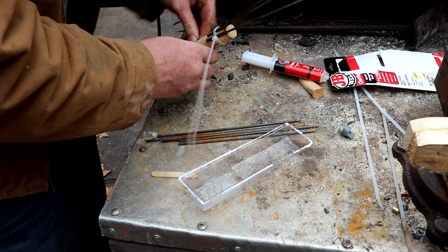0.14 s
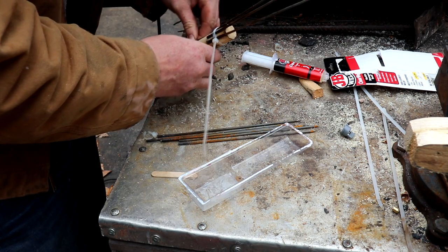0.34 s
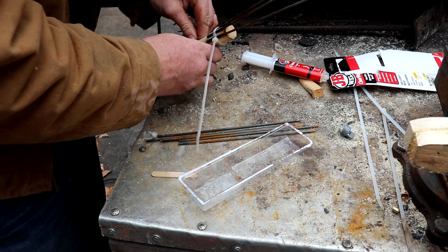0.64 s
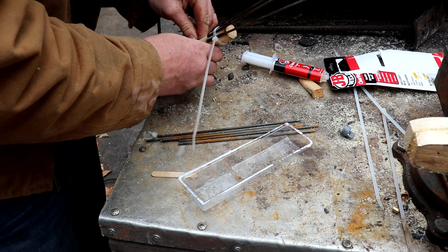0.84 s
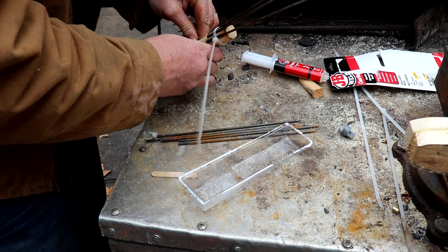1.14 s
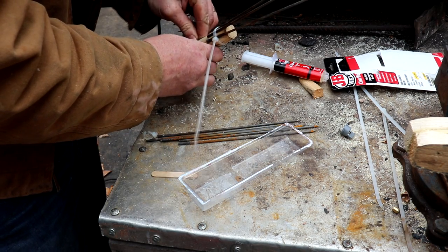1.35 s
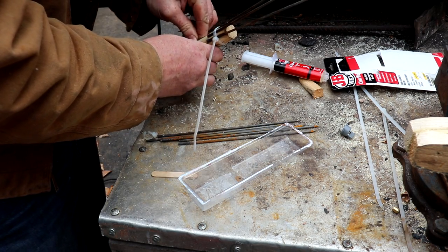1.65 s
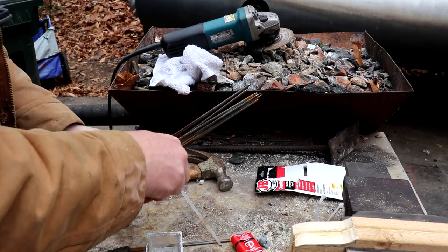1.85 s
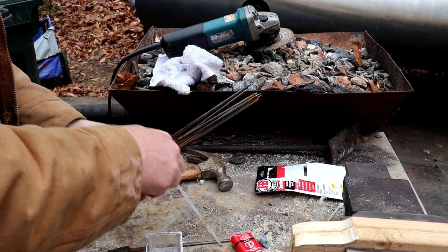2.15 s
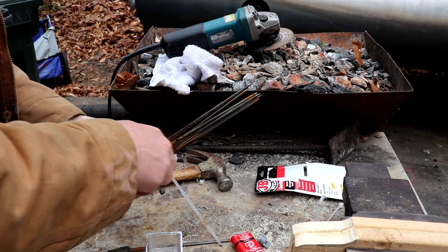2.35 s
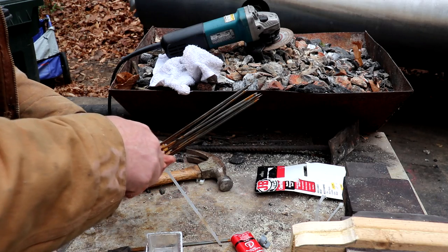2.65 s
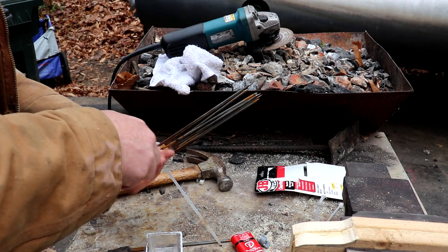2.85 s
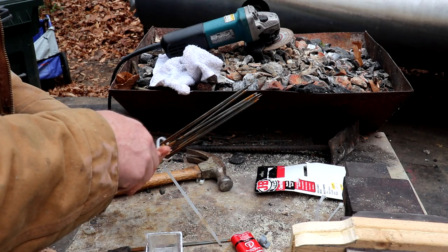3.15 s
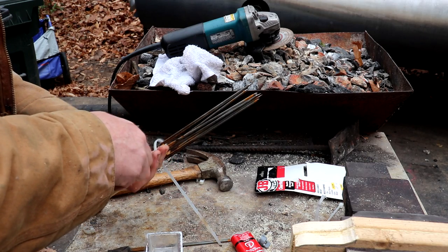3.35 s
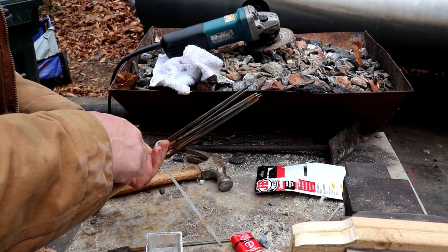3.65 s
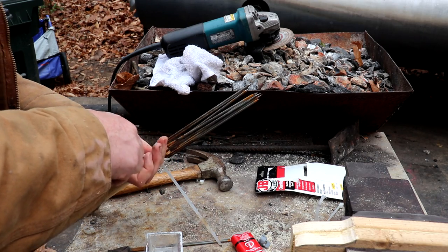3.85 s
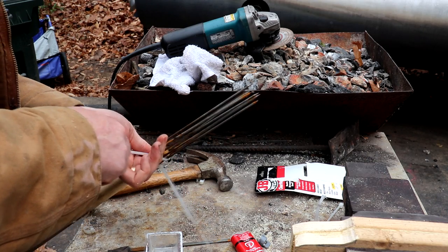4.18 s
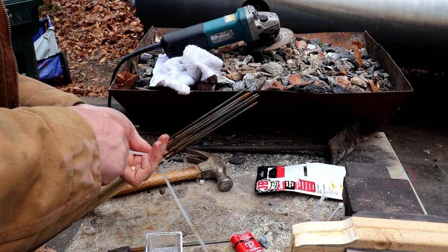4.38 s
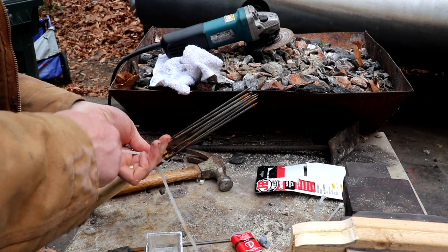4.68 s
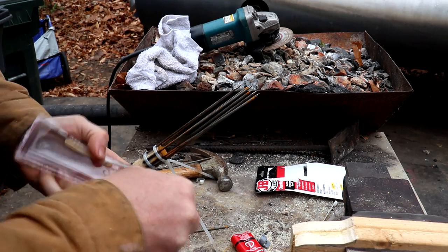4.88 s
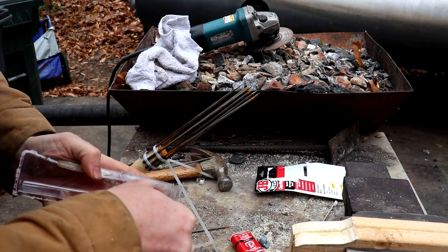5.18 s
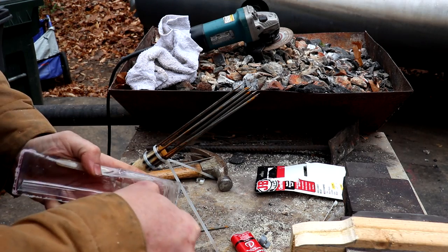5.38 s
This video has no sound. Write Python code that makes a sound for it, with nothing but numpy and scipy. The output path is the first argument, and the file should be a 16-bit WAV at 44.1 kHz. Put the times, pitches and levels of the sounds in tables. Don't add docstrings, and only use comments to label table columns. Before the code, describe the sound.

Close, dry bench sounds in an open yard with distant traffic rumbling. Rods hum and rustle as they are dragged, then knock on the metal top. A thin far bird call comes before clear high whistles that overlap the first crisp zip-tie pull. After handling rustle the second tie clicks tight, with a short scuff and soft thuds; finally a plastic tray flexes with two hard pops. Abrupt scene cuts.

```python
import sys
import numpy as np
from scipy import signal
from scipy.fft import rfft, irfft
from scipy.io import wavfile
from scipy.ndimage import uniform_filter1d

SR = 44100
rng = np.random.default_rng(int(sys.argv[2]) if len(sys.argv) > 2 else 0)


def output_pcm(signal):
    pcm = np.clip(np.atleast_2d(signal).T, -1, 1) * 32767
    wavfile.write(sys.argv[1], SR, np.round(pcm).astype(np.int16))


def volts_from_db(level):
    exponent = np.asarray(level, float) / 20
    return 10 ** exponent


N = 243431


def in_time(rows):
    s, *columns = np.transpose(rows)
    return [np.interp(np.arange(N) / SR, s, c) for c in columns]


def rms_one(x):
    return x / np.sqrt(np.mean(x ** 2) + 1e-20)


def drift(rate_hz):
    steps = rng.standard_normal(int(N / SR * 60) + 2)
    place = np.arange(N) / SR * np.clip(rate_hz, .1, 60)
    return np.interp(place, np.arange(len(steps)), steps)


def coloured(spectrum, patchy_db):
    hz, db = np.transpose(spectrum)
    f = np.fft.rfftfreq(N, 1 / SR) + 1
    shape = volts_from_db(np.interp(np.log(f), np.log(hz), db, -99, -99))
    noise = irfft(rfft(rng.standard_normal(N)) * shape, N)
    return rms_one(noise * volts_from_db(patchy_db * drift(16)))


def resonance(x, hz, width_hz):
    r = np.exp(-np.pi * width_hz / SR)
    b = np.array([1, 0, -1]) * (1 - r * r) / 2
    return signal.lfilter(b, [1, -2 * r * np.cos(2 * np.pi * hz / SR), r * r], x)


def add(out, s, sound):
    i = round(s * SR)
    out[i:i + len(sound)] += sound[:N - i]


def struck(modes, t, spread_db):
    hz, db, t60 = np.transpose(modes)[:, :, None]
    level_db = db + spread_db * rng.standard_normal(hz.shape) - 60 * t / t60
    return np.sum(volts_from_db(level_db) * np.sin(2 * np.pi * hz * t), axis=0)


def crack(t, t60, low_hz):
    burst = rng.standard_normal(len(t)) * volts_from_db(-60 * t / t60)
    return signal.sosfilt(signal.butter(2, low_hz, "high", fs=SR, output="sos"), burst)


def swells(rows):
    s, db, rise, fall = np.transpose(rows)[:, :, None]
    t = np.arange(N) / SR - s
    slope = np.where(t < 0, t / rise, -t / fall)
    return np.sqrt(np.sum(volts_from_db(db + 20 * slope) ** 2, axis=0))


def yard(x, near_db, far_db):
    t = np.arange(9000) / SR
    near = volts_from_db(near_db - 60 * t / 0.028) * (t > .0008)
    far = volts_from_db(far_db - 60 * t / 0.18) * (1 - np.exp(-(t / 0.017) ** 2))
    scatter, answer = rng.standard_normal((2, len(t))) * [near, far]
    scatter = scatter + volts_from_db(9.5) * resonance(scatter, 2230, 1600)
    answer = answer + volts_from_db(19.0) * resonance(answer, 2680, 1800)
    return x + signal.fftconvolve(x, scatter + answer)[:N]


# [pitch_hz, level_db per Hz]
TRAFFIC = [(12, -63), (20, -12.5), (163, -2), (221, -3.5), (270, -11), (347, -14.5), (424, -23.5),
           (677, -17.5), (857, -35), (1080, -36), (1500, -55), (1950, -72), (3300, -120)]
# [pitch_hz, level_db per Hz]
HANDLING = [(240, -10.5), (400, -3), (677, -5.5), (882, -6.5), (1080, -7.5), (1260, -8.5), (1360, -9.5),
            (1550, -12), (3140, -11), (7000, -35), (9100, -38.5), (15400, -120)]
# [pitch_hz, level_db per Hz]
AIR = [(2350, -19), (4000, -4.5), (7630, 2.5), (8250, 2), (15100, -1), (16200, -16), (16500, -35.5)]
TAKE_STARTS = [0, .572, 1.756, 3.0, 4.794]
# [traffic_db, handling_db, air_db]
TAKES = [
    (-52.5, -48, -68),
    (-52, -55, -69),
    (-48.5, -55.5, -67.5),
    (-47, -56, -67.5),
    (-45.5, -52.5, -65.5),
]
# [peak_s, level_db, rise_s, fall_s]
HANDS = [
    (1.15, -37.5, 0.011, 0.092),
    (2.6, -46, 0.22, 0.1),
    (4.13, -42.5, 0.21, 0.51),
    (4.25, -40.5, 0.025, 0.039),
    (5.28, -58, 0.34, 0.55),
]


def ground():
    take = np.searchsorted(np.array(TAKE_STARTS) * SR, np.arange(N), side="right") - 1
    traffic, hands, air = volts_from_db(np.array(TAKES)[take].T)
    hands = (hands + swells(HANDS)) * coloured(HANDLING, patchy_db=2.0)
    return traffic * coloured(TRAFFIC, patchy_db=1.5) + hands + air * coloured(AIR, patchy_db=0.0)


# [peak_s, level_db, rise_s, fall_s]
DRAG = [
    (.2, -48, 0.063, 0.23),
    (.42, -57, 0.078, 0.17),
    (4.25, -31, 0.033, 0.024),
]
# [pitch_hz, width_hz, level_db]
DRAGGED = [(362, 83, 7), (726, 45, 7.5), (1635, 48, 20), (2580, 106, 14.5), (3385, 200, 18.5),
           (3490, 71, -8), (5000, 680, -50)]
STEADY_DRAG_DB = -53


def drag():
    grains = rng.standard_normal(N) * volts_from_db(3.9 * drift(45))
    first = np.arange(N) < TAKE_STARTS[1] * SR
    level = first * (swells(DRAG[:2]) + volts_from_db(STEADY_DRAG_DB)) + swells(DRAG[2:])
    hum = sum(volts_from_db(db) * resonance(grains, hz, width) for hz, width, db in DRAGGED)
    return level * rms_one(hum)


# [start_s, peak_db, boom_db, crack_db, brightness_db per octave]
KNOCKS = [(0.047, -30.5, -40, -62, -2), (0.77, -30, -37.5, -59, -4.5), (0.85, -30.5, -42, -80, -6),
          (0.924, -51, -55, -88, -4), (1.036, -19.5, -35.5, -59, -5.5), (1.098, -32.5, -43, -54, 0),
          (1.135, -21.5, -36, -26.5, 3.5), (1.297, -20, -33, -26.5, 7), (1.413, -19, -32, -27.5, 5.5),
          (1.517, -18, -38.5, -24.5, 5), (1.636, -14, -38, -26, 2.5), (3.315, -40.5, -62, -37.5, 12)]
# [pitch_hz, level_db, t60_s]
BOOM = [(147, -9.5, 0.35), (224.7, 2.5, 0.18), (306, -4.5, 0.2), (396, -13.5, 0.2)]
# [pitch_hz, level_db, t60_s]
RODS = [(520, -22, 0.07), (867, -15, 0.07), (1250, -8, 0.06), (1325, 2, 0.07), (1420, -1, 0.05),
        (1520, -1, 0.05), (1775, -10, 0.1), (2064, -12, 0.056), (2390, -10, 0.03), (2700, -14, 0.03),
        (3000, -10, 0.015), (3310, -5, 0.025), (3780, -7, 0.022), (6930, -12, 0.0076)]


def knocks():
    out, t = np.zeros(N), np.arange(9000) / SR
    rise = 1 - np.exp(-t / 0.0012)
    slow_rise = 1 - np.exp(-t / 0.004)
    for s, peak_db, boom_db, crack_db, tilt_db in KNOCKS:
        modes = [(hz, db + tilt_db * np.log2(hz / 1400), t60) for hz, db, t60 in RODS]
        rods = volts_from_db(peak_db - 9.5) * rise * struck(modes, t, spread_db=1.9)
        add(out, s, rods + volts_from_db(crack_db + 0.5) * crack(t, 0.016, 3100))
        add(out, s, volts_from_db(peak_db - 38) * rise * resonance(crack(t, 0.18, 540), 1200, 1700))
        rattle = resonance(resonance(crack(t, 0.078, 490), 1520, 300), 1320, 280)
        add(out, s, volts_from_db(peak_db - 7.5) * rise * rattle)
        add(out, s + 0.0036, volts_from_db(crack_db - 13.5) * resonance(crack(t, 0.17, 1500), 2100, 790))
        boom = struck(BOOM, t, spread_db=3.0) + volts_from_db(15) * resonance(crack(t, 0.2, 90), 247, 100)
        add(out, s + 0.003, volts_from_db(boom_db + 4) * slow_rise * boom)
    return out


# [peak_s, level_db, rise_s, fall_s, pitch_hz]
BUMPS = [
    (.2, -40, 0.053, 0.089, 765),
    (4.15, -33, 0.073, 0.099, 112),
    (4.29, -44.5, 0.095, 0.086, 124),
    (4.41, -35.5, 0.075, 0.12, 121),
    (1.165, -40, 0.032, .04, 870),
    (4.1, -46, 0.11, 0.073, 3750),
    (4.12, -44, .1, 0.11, 585),
]
BUMP_WIDTH = 0.21


def bumps():
    white, out = rng.standard_normal(N), np.zeros(N)
    for *row, hz in BUMPS:
        width = BUMP_WIDTH * hz
        out += swells([row]) * rms_one(resonance(resonance(white, hz, width), hz, width))
    return out


def note(rows, fade_s, wobble_hz):
    hz, db = in_time(rows)
    power = volts_from_db(2 * db)
    hz = uniform_filter1d(hz * power, size=500) / uniform_filter1d(power, size=500)
    start, end = rows[0][0], rows[-1][0]
    gate, = in_time([(start, 0), (start + fade_s, 1), (end - fade_s, 1), (end, 0)])
    return np.sqrt(2) * gate * volts_from_db(db), np.cumsum(2 * np.pi * (hz + wobble_hz * drift(40)) / SR)


def afar(x, t60, direct_db):
    tail = rng.standard_normal(12000) * volts_from_db(-60 * np.arange(12000) / SR / t60)
    return volts_from_db(direct_db) * x + signal.fftconvolve(x, tail / np.linalg.norm(tail))[:N]


def roughness(size):
    return rms_one(uniform_filter1d(rng.standard_normal(N), size=size))


# [start_s, pitch_hz, level_db]
SEET = [(1.15, 8700, -70), (1.168, 8050, -59), (1.19, 7500, -56), (1.215, 7320, -56), (1.29, 7250, -61),
        (1.32, 7350, -67)]
# [start_s, pitch_hz, level_db]
WHISTLE = [
    [(1.757, 3300, -55), (1.763, 3220, -42), (1.771, 3300, -36.5), (1.795, 3170, -44), (1.803, 3280, -40.5),
     (1.879, 3310, -35), (1.885, 3370, -49), (1.93, 3230, -31)],
    [(1.93, 3270, -35), (1.962, 3237, -32), (1.98, 3250, -44), (1.984, 3220, -39), (2.028, 3223, -32),
     (2.07, 3200, -48)],
    [(2.07, 3254, -40), (2.096, 3220, -32), (2.11, 3340, -47), (2.126, 3230, -35), (2.196, 3270, -50),
     (2.202, 3440, -53), (2.21, 3330, -42)],
    [(2.22, 3169, -50), (2.234, 3140, -40), (2.248, 3205, -37), (2.284, 3234, -32.5), (2.298, 3230, -34),
     (2.312, 3280, -50), (2.315, 3240, -46)],
    [(2.315, 3180, -44), (2.333, 3270, -33), (2.353, 3240, -42), (2.363, 3230, -30), (2.387, 3290, -44),
     (2.403, 3235, -28.5), (2.451, 3253, -40), (2.48, 3288, -55)],
    [(2.53, 3297, -58), (2.542, 3122, -42), (2.558, 3260, -42), (2.604, 3260, -40), (2.62, 3170, -39),
     (2.628, 3330, -49), (2.67, 3170, -45), (2.7, 3340, -56)],
]
FLUTTER = .15


def birds():
    level, phase = note(SEET, 0.011, 70)
    low, high = np.sin(phase) * roughness(150), np.sin(1.075 * phase) * roughness(60)
    thin = level * (low + volts_from_db(-2) * high)
    notes = [note(rows, 0.003, 8.3) for rows in WHISTLE]
    whistle = sum(level * np.sin(phase) for level, phase in notes)
    echoes = afar(whistle, t60=0.2, direct_db=-40)
    whistle = whistle * (1 + FLUTTER * roughness(420)) * volts_from_db(0.5) + volts_from_db(-12) * echoes
    return whistle + volts_from_db(-4.0) * afar(thin, t60=.3, direct_db=-1.5)


def teeth_of(pull):
    s, speed, db = np.transpose(pull)
    t = np.arange(s[0], s[-1], 1 / SR)
    travelled = np.cumsum(np.interp(t, s, speed)) / SR
    times = np.interp(np.arange(int(travelled[-1]) + 1), travelled, t)
    return list(zip(times, np.interp(times, s, db)))


# [start_s, speed_teeth_per_s, peak_db]
FIRST_PULLS = [
    [(1.944, 29.5, -1), (1.988, 64.7, -2), (2.03, 56.1, -4), (2.066, 76.4, -5.5), (2.078, 62.3, -6),
     (2.143, 43.9, -6.5), (2.162, 92.8, -8), (2.187, 78.3, -8), (2.216, 105.2, -8)],
    [(2.22, 124.9, -17), (2.243, 136.4, -12.5), (2.271, 191.6, -7), (2.297, 179.8, -7), (2.329, 94, -7.5),
     (2.348, 57.8, -6.5)],
    [(2.3609, 68.9, -8), (2.428, 135, -5.5), (2.477, 114.7, -5.5), (2.513, 100.5, -6), (2.572, 113.1, -7),
     (2.592, 157, -11.5), (2.633, 153.8, -11), (2.678, 34.7, -11), (2.6952, 52.8, -13.5)],
]
# [start_s, speed_teeth_per_s, peak_db]
SECOND_PULLS = [
    [(3.7642, 33.5, -8.5), (3.82, 75.8, -7.5), (3.832, 94.3, -9), (3.861, 99.8, -8.5), (3.883, 61.7, -9.5),
     (3.905, 48.2, -10.5), (3.925, 47.6, -10), (3.99, 56.8, -9.5)],
    [(4.0091, 61, -10), (4.033, 73, -9), (4.065, 84.8, -9), (4.12, 121.8, -12.5), (4.133, 110.3, -15),
     (4.15, 99.5, -14), (4.2062, 46, -12)],
]
# [start_s, peak_db]
TUGS = [
    [(2.753, -14.6), (2.7778, -13.3), (2.7941, -9.6), (2.8108, -10.8), (2.8358, -13.7), (2.8657, -13.4),
     (2.8869, -12.4), (2.9036, -11.1), (2.919, -12.2), (2.9369, -14.0), (2.9601, -14.7)],
    [(3.5806, -7.4), (3.6076, -8.7), (3.6272, -9.5), (3.6461, -8.9), (3.6616, -8.2), (3.6763, -8.0),
     (3.6958, -7.6)],
    [(4.2241, -10.1), (4.2474, -8.8), (4.2807, -5.8), (4.344, -6.6), (4.3874, -3.2), (4.4674, -3.4),
     (4.5609, -2.2), (4.61, -4.5), (4.7258, -3.0)],
]


def grips():
    a, b, c = map(teeth_of, FIRST_PULLS)
    d, e = map(teeth_of, SECOND_PULLS)
    return [a, b + c, TUGS[0], TUGS[1] + d, e, TUGS[2]]


# [pitch_hz, width_hz, level_db]
PAWL = [
    [(4370, 1350, -12), (8000, 150, -13.5), (9300, 120, -36), (10130, 180, -1.5), (10800, 340, -5),
     (12400, 120, 0.5), (13900, 400, 5.5), (12340, 1700, -0.5), (15500, 170, -6), (15300, 260, -38)],
    [(4570, 450, -14), (8070, 120, -16.5), (10070, 170, -12), (10340, 130, 0.5), (11900, 340, -13),
     (11200, 60, -4), (12570, 320, -11), (12400, 170, -10.5), (13550, 370, 5.5), (15170, 89, 0.5)],
    [(6200, 280, -22), (7300, 140, -4), (10040, 220, 0.5), (11300, 110, 6.5), (11950, 440, 4),
     (13700, 140, 3.5), (13440, 200, 3), (12700, 86, -13), (13450, 120, -6), (14860, 200, -1.5)],
]
# [pitch_hz, width_hz, level_db]
SECOND_PAWL = [
    [(3570, 210, -73.5), (5360, 130, -51), (7300, 250, -24), (7530, 170, -4.5), (10000, 150, -43),
     (9200, 260, -0.5), (11640, 410, 15), (12560, 170, 7), (14260, 270, 7), (16600, 800, 5)],
    [(4130, 230, -11.5), (3400, 310, -3), (6200, 300, -29.5), (7300, 160, -7), (9500, 25, -39),
     (10700, 140, -1), (11450, 820, 6), (12900, 600, 1.5), (15440, 36, 0.5), (14700, 290, -11)],
    [(4270, 790, -18.5), (5900, 200, -22.5), (6500, 150, -43), (8170, 380, -8), (9370, 390, -3),
     (11600, 500, 6.5), (15300, 430, -1), (16960, 370, -29)],
]
# [pitch_hz, width_hz, level_db]
STRAP = [
    [(824, 300, -13.5), (1120, 270, -9.5), (1650, 300, -13.5), (2160, 420, -13), (3440, 440, -10)],
    [(794, 260, -9), (1090, 290, -7), (1700, 220, -5.5), (2123, 180, -5), (3460, 230, -7)],
    [(870, 210, -5.5), (1030, 140, -12), (1750, 260, -4), (2050, 200, -1), (3280, 1100, -4.5)],
    [(1110, 120, -3.5), (1660, 125, 0), (2350, 95, -7), (2880, 1270, -6)],
    [(1150, 200, -15), (1750, 120, -8.5), (2240, 200, -12.5), (3000, 260, -5), (3750, 420, -9)],
    [(1550, 160, -13), (2160, 115, -3.5), (2590, 330, 0.5), (3200, 460, -7)],
]
# [delay_ms, level_db]
BOUNCES = [
    [(.55, 16), (1.3, -9), (2.0, 5.5), (2.9, 1)],
    [(.6, 12.5), (1.3, -4), (2.0, 7.5), (2.9, 1)],
    [(.6, 14), (1.3, -21), (2.0, 6), (2.9, -1)],
    [(.55, 18), (1.3, -17), (1.9, 3), (2.9, -3)],
    [(.55, 18), (1.3, 0.1), (1.9, -1), (2.9, -8)],
    [(.6, 4.2), (1.1, -11), (1.6, -6.5), (2.6, -35)],
]
GRIP_DB = [0.13, 0.11, 0.14, 0.18, 0.085, 0.11]
GRIP_LAG_MS = [0.22, -.6, -0.039, 0.058, -0.064, 0.27]
TICK_DB = [-21, -14.5, -13.5, -9.5, -17, -14]
TOOTH_SPREAD_DB = 0.6
DAMPING = 0.061
CLUTTER_DB, CLUTTER_T60_S = -25.5, 0.018
CLUTTER_KEPT = .85


def ratchet():
    out, t = np.zeros(N), np.arange(600) / SR
    holds = zip(grips(), GRIP_DB, TICK_DB, GRIP_LAG_MS, PAWL + SECOND_PAWL, STRAP, BOUNCES)
    for teeth, grip_db, tick_db, lag_ms, pawl, strap, bounces in holds:
        hz, width, db = np.transpose(strap + pawl + [(7170, 6600, tick_db)])[:, :, None]
        width = np.maximum(width, DAMPING * hz)
        mode = np.arange(len(hz))[:, None]
        height = volts_from_db(db) * width * (-1.) ** mode
        bright = mode >= len(strap)
        chance = rng.standard_normal((len(teeth), len(hz) + 4))
        walk = np.cumsum(chance, axis=0)
        walk = walk - walk.mean(axis=0)
        fresh = np.sqrt(1 - CLUTTER_KEPT ** 2) * rng.standard_normal((len(teeth) + 8, len(t)))
        clutter = signal.lfilter([1], [1, -CLUTTER_KEPT], fresh, axis=0)[8:]
        clutter = clutter * volts_from_db(CLUTTER_DB - 60 * t / CLUTTER_T60_S) * (t > .0008)
        paths = [(0.0025, 0.018)] + bounces
        for (s, peak_db), wander, own, scatter in zip(teeth, walk, chance, clutter):
            snap = 0
            for (ms, bounce_db), shift in zip(paths, [0, *wander[-4:]]):
                late = np.maximum(t - (ms + 0.007 * shift) / 1000, 0)
                ring = np.exp(-np.pi * width * late) * np.sin(2 * np.pi * hz * late)
                snap = snap + (bright | (ms < 1)) * volts_from_db(bounce_db) * ring
            strength = volts_from_db(.3 * wander[:-4] + 0.9 * own[:-4])[:, None]
            snap = np.sum(snap * height * strength, axis=0)
            snap = snap + signal.fftconvolve(snap, scatter)[:len(t)]
            level = volts_from_db(peak_db + grip_db + TOOTH_SPREAD_DB * own[-1])
            add(out, s + lag_ms / 1000, level * snap / np.abs(snap).max())
    return out


def slide(snaps):
    keep = np.exp(-1 / (0.01 * SR))
    power = signal.lfilter([1 - keep], [1, -keep], snaps ** 2 + 1e-18)
    return volts_from_db(-29) * np.sqrt(power) * coloured(AIR, patchy_db=5.5)


# [peak_s, level_db, rise_s, fall_s]
CRINKLE = [
    (4.96, -54.5, .06, 0.071),
    (5.135, -46, 0.099, 0.099),
    (5.17, -49, 0.04, 0.2),
    (5.28, -53, 0.14, 0.068),
    (5.505, -43.5, 0.055, 0.11),
]
# [start_s, peak_db, pitch_hz, t60_s, crack_db]
POPS = [(5.068, -46, 2580, .012, -32), (5.1363, -30, 2150, 0.0093, -19), (5.1417, -5, 2220, 0.022, 4),
        (5.1412, -4.5, 3730, 0.014, -42), (5.1425, -8.5, 7300, 0.0059, -40), (5.143, -22, 1150, 0.05, -50),
        (5.193, -12.5, 760, 0.012, -50), (5.194, -19, 480, .012, -50), (5.193, -19.5, 2400, 0.013, -55),
        (5.2549, 1, 3200, 0.012, -26), (5.2550, -5, 1635, 0.012, -3), (5.2553, -12, 1060, 0.035, -36),
        (5.2555, -26, 8000, 0.0073, -38), (5.257, -25, 350, 0.042, -30)]
# [peak_s, level_db, rise_s, fall_s]
SCRAPE = [
    (5.175, -45, 0.053, 0.035),
    (5.285, -45, 0.068, .06),
]


def tray():
    out, t = np.zeros(N), np.arange(3000) / SR
    for s, peak_db, hz, t60, crack_db in POPS:
        cluster = [(hz, 0, t60), (hz * 1.043, -6, t60 * 0.83), (hz * 0.9, -7, t60 * 0.73)]
        pop = volts_from_db(peak_db - 6) * struck(cluster, t, spread_db=1.5)
        add(out, s, pop + volts_from_db(crack_db) * resonance(crack(t, 0.0044, 790), 3000, 6900))
    out = signal.sosfilt(signal.butter(2, [260, 9000], "band", fs=SR, output="sos"), out)
    clicks = rng.random(N) < 6000 / SR
    grains = clicks * volts_from_db(2.9 * rng.exponential(1, N)) * rng.choice([-1, 1], N)
    crinkle = resonance(grains, 2300, 1800) + volts_from_db(-2.5) * resonance(grains, 3200, 700)
    crinkle = crinkle + volts_from_db(-37) * resonance(grains, 7200, 6000)
    scrape = resonance(grains, 4250, 380) + volts_from_db(-18) * resonance(grains, 3500, 500)
    return out + swells(CRINKLE) * rms_one(crinkle) + swells(SCRAPE) * rms_one(scrape)


def scene():
    snaps = ratchet()
    near = yard(knocks(), near_db=-27, far_db=-49.0)
    near = near + yard(snaps, near_db=-38.5, far_db=-52.5)
    near = near + yard(tray(), near_db=-32.5, far_db=-60.0)
    return (ground() + drag() + bumps() + birds() + near + slide(snaps))[None]


GAPS = [
    1.756,
    4.795,
]


def joins(dry):
    t = np.arange(N) / SR
    return dry * np.prod([1 - 1.1 * np.exp(-((t - s) / 0.0029) ** 2) for s in GAPS], axis=0)


def low_pass(x):
    return signal.sosfilt(signal.butter(12, 16980, fs=SR, output="sos"), x)


def record(dry):
    low_cut = signal.butter(2, 52, "high", fs=SR, output="sos")
    high_cut = signal.cheby2(10, 60, 17200, fs=SR, output="sos")
    overloaded = np.clip(joins(dry), -1, 1)
    mix = signal.sosfilt(np.vstack([low_cut, high_cut]), overloaded)
    return low_pass(mix)


dry = scene()
out = record(dry)
output_pcm(out)
```